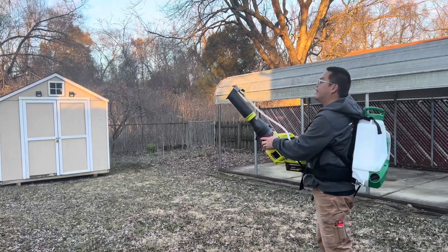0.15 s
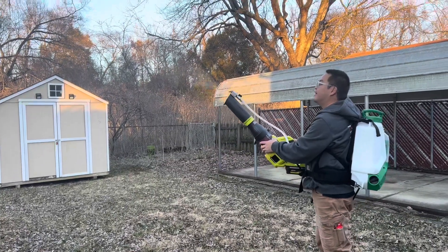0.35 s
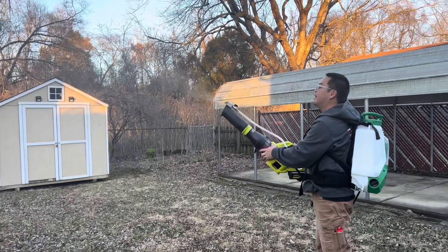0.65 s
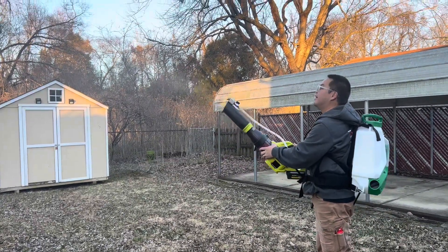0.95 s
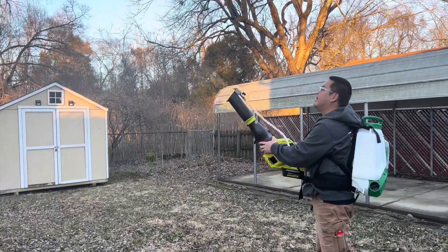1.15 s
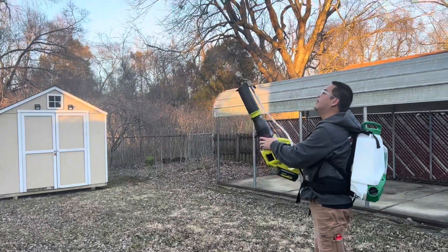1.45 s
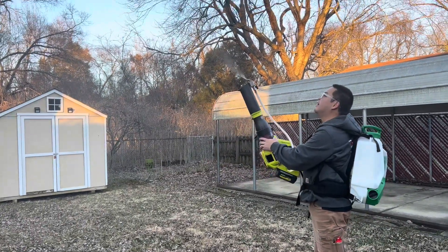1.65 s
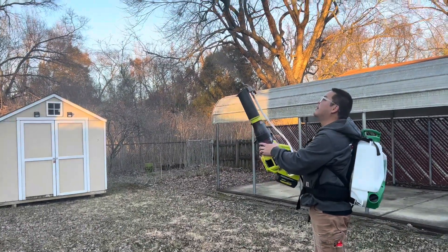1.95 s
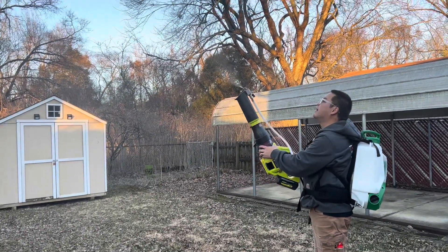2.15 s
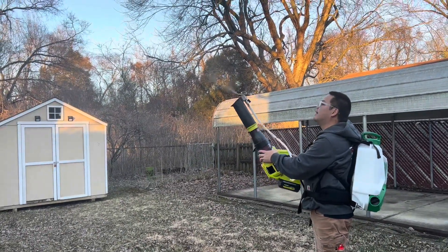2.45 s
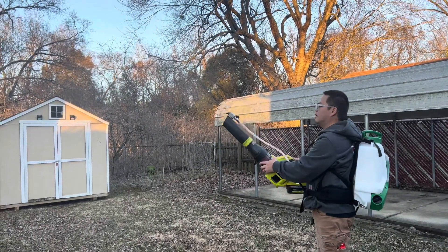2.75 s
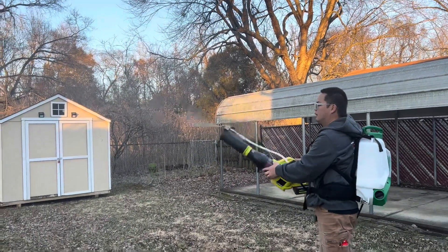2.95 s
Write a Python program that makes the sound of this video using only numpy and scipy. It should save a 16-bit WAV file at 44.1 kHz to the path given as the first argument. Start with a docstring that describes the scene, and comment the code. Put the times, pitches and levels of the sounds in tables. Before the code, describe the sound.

A battery leaf blower a few metres away runs at full speed throughout, its piercing steady whine riding on dense rushing air, swelling and shifting slightly as the tube tilts; open yard, stereo phone microphone.

```python
"""In a yard, a battery leaf blower a few metres from a phone runs flat out and is tilted up and down.
A nine-bladed fan whines in sines at multiples of the shaft speed; each strong tone swells and shifts
between the ears as the tube turns. Coloured noise makes the rushing air, and narrower noise bands
the tube's boom and howls, the haze around the blade tone and a wavering hum.
A low drone, one gliding sine, passes in the distance."""
import sys
import numpy as np
from scipy import signal
from scipy.fft import rfft, irfft
from scipy.io import wavfile
from scipy.ndimage import uniform_filter1d

SR = 44100
rng = np.random.default_rng(int(sys.argv[2]) if len(sys.argv) > 2 else 0)


def dump(signal):
    """Clip the signal to [-1, 1] and save it as 16-bit WAV at the path in sys.argv[1]."""
    limited = np.clip(np.atleast_2d(signal).T, -1, 1)
    pcm = np.round(limited * 32767).astype(np.int16)
    wavfile.write(sys.argv[1], SR, pcm)


N = 136710
TIME_S = np.arange(N) / SR

# Noise bands: boom, low howl, high howl, haze, hum.
# Each row: width in Hz, level offset in dB, opposed part relative to the common part in dB.
RINGS = [(98, -4, -17), (148, -3.5, -17), (148, -4.5, -20), (93, -2.5, -10), (6, -1.5, -2)]


def undb(db):
    """Gain of a level in dB."""
    return 10 ** (np.asarray(db) / 20)


def curve(table, col):
    """One column of a table, interpolated sample by sample over the time in column 0."""
    rows = np.array(table, float)
    return np.interp(TIME_S, rows[:, 0], rows[:, col])


def walk(rate_per_s):
    """Random levels held 1 / rate_per_s and smoothed twice over that time; spread about 0.75."""
    hold = int(SR / rate_per_s)
    steps = np.repeat(rng.standard_normal(N // hold + 1), hold)
    smooth = uniform_filter1d(uniform_filter1d(steps, hold), hold)
    return 1.02 * smooth[:N]


def unit(x):
    """Scale to an rms of 1."""
    return x / np.sqrt(np.mean(x ** 2))


def drone():
    """Distant drone: one sine, gliding in pitch and level, equal in both ears."""
    # Each row: time in seconds, frequency in Hz, rms level in dB.
    drone_rows = [(0.0, 77.7, -59), (0.47, 76.7, -56), (0.65, 70.3, -67), (0.78, 76, -59),
                  (1.26, 71.36, -61), (2.02, 80.7, -48.5), (2.57, 77.7, -57), (3.0, 83.5, -58),
                  (3.1, 89.6, -53)]
    phase = 2 * np.pi * np.cumsum(curve(drone_rows, 1)) / SR
    return np.sqrt(2) * undb(curve(drone_rows, 2)) * np.sin(phase)


def ring(table, width_hz, offset_db, side_db):
    """Noise band: lowpassed noise on a moving carrier, part common to the ears, part opposed."""
    lowpass = signal.butter(2, width_hz / 2, fs=SR, output="sos")
    slow = signal.sosfilt(lowpass, rng.standard_normal((2, 2, N)))
    phase = 2 * np.pi * np.cumsum(curve(table, 2)) / SR
    mid, side = (unit(v) for v in slow[0] * np.cos(phase) + slow[1] * np.sin(phase))
    side = undb(side_db) * side
    return np.array([mid + side, mid - side]) * undb(curve(table, 1) + offset_db)


def hum():
    """Wavering hum: a very narrow noise band, wide between the ears."""
    # Each row: time in seconds, level before offset in dB, centre in Hz.
    hum_rows = [(0, -57.5, 136), (1.0, -64, 136), (1.3, -54.5, 136), (1.7, -52.5, 136), (2.0, -64, 136),
                (2.8, -60, 136), (3.1, -65, 136)]
    return ring(hum_rows, *RINGS[4])


def rush():
    """Rushing air: coloured noise, partly shared by the ears; each octave drifts and flickers alone."""
    # Each row: frequency in Hz, common part in relative dB per Hz, opposed part in relative dB per Hz,
    # lean to the left from -1 to 1.
    air_rows = np.array([(45.0, -12.5, -34.1, 0.07), (60.3, -16, -33, -0.03), (87, -13.5, -19, 0.37),
                         (110.0, -15.5, -31, 0.1), (133, -11.5, -19.0, -0.01), (178, -19, -28.0, 0.28),
                         (244, -14, -27, 0.51), (305, -7, -19.5, 0.38), (415, -10, -21, 0.12),
                         (540, -14.5, -16, 0.032), (695, -11.0, -14, -0.36), (935, -7, -11.9, -0.17),
                         (1100.0, -7.5, -12, -0.02), (1310, -6.5, -12.9, 0.062), (1530, -13, -13, -0.22),
                         (1770, -11, -13, -0.21), (2000.0, -2, -13, -0.11), (2220, -6, -25, 0.1),
                         (2420, -5, -16, 0.07), (2750, -6.5, -12, 0.26), (3060, -9.9, -15, 0.44),
                         (3370, -14, -13, 0.16), (3570, -7.5, -14, 0.01), (3820, -7.6, -12, 0.33),
                         (4030, -11.5, -13.5, 0.051), (4650, -10, -13.5, 0.28), (5040, -12.5, -14.0, 0.39),
                         (5400, -16, -19, 0.6), (5560.0, -13.5, -14, 0.69), (5970, -11, -12, 0.65),
                         (6200.0, -13.5, -15.5, 0.55), (6830, -13, -15, 0.58), (7400.0, -18, -16.1, 0.37),
                         (8100.0, -15.5, -14.8, 0.39), (8750, -19, -19, 0.4), (9820, -23.5, -19.8, -0.17),
                         (10130, -26, -21.6, -0.04), (10700, -69, -22.7, -0.01), (11060, -37, -21.3, 0.01),
                         (11260, -24.6, -18, 0.02), (11740, -18, -17.2, 0.01), (12400, -16.7, -19.5, 0.03),
                         (12700.0, -17, -38, -0.0), (14100, -20, -50.0, -0.01),
                         (14500.0, -27, -42.9, -0.04), (15000.0, -32, -38, 0.02), (15500, -43.3, -32, 0.05)])
    # Each row: time in seconds, level before lift in dB.
    level_rows = [(0, -39), (.3, -38.5), (.8, -39.5), (1.2, -40), (1.8, -40), (2.0, -40), (2.5, -40.5),
                  (2.8, -40.3), (3.1, -40.5)]
    lift_db = 11
    drift_db, drift_per_s = 0.83, 2.13  # dB per unit of walk
    flicker_db, flicker_per_s = 1.3, 7.89

    hz = np.arange(N // 2 + 1) * SR / N + 1e-3
    log_hz, log_row_hz = np.log(hz), np.log(air_rows[:, 0])
    mid_db, side_db, lean = (np.interp(log_hz, log_row_hz, air_rows[:, k]) for k in (1, 2, 3))
    lean = np.clip(lean, -1, 1)
    low_cut = np.minimum(hz / air_rows[0, 0], 1) ** 5
    a, b = rfft(rng.standard_normal((2, N))) * low_cut
    mid = a * undb(mid_db)
    side = (lean * a + np.sqrt(1 - lean ** 2) * b) * undb(side_db)  # correlation with mid = lean
    ears = np.array([mid + side, mid - side])

    out = 0
    for octave in range(10):
        # crossfaded octave bands, centred from 32 Hz up
        band = np.cos(np.pi / 2 * np.clip(np.log2(hz / 32) - octave, -1, 1)) ** 2
        sway_db = drift_db * walk(drift_per_s) + flicker_db * walk(flicker_per_s)
        out = out + irfft(ears * band, N) * undb(sway_db)
    return unit(out) * undb(curve(level_rows, 1) + lift_db)


def tube_resonances():
    """Tube resonances: a boom, and howls below and above the blade tone, as noise bands."""
    # Each row: time in seconds, level before offset in dB, centre in Hz.
    boom_rows = [(0, -43, 303.5), (.15, -40, 305), (.45, -39, 304.5), (.9, -43.5, 305), (1.3, -38, 302.8),
                 (1.9, -41.5, 306), (2.2, -41.5, 307), (2.7, -44.5, 299.7), (2.87, -39.5, 290.6),
                 (3.1, -42, 299.5)]
    low_howl_rows = [(0, -36, 1720), (.6, -36, 1715), (1.2, -38.5, 1722), (1.45, -33, 1850),
                     (1.8, -32, 1852), (2.3, -35, 1833), (2.499, -36.5, 1809), (2.75, -37.5, 1768),
                     (3.1, -37, 1760)]
    high_howl_rows = [(0, -38, 2060), (.45, -32, 2043), (.72, -32, 2041), (1.05, -33, 2045),
                      (1.25, -44, 2100), (1.45, -35.5, 2146), (2.1, -34, 2140), (2.4, -37.5, 2142),
                      (2.8, -37, 2090), (3.1, -32, 2090)]
    tables = [boom_rows, low_howl_rows, high_howl_rows]
    return sum(ring(table, *settings) for table, settings in zip(tables, RINGS[:3]))


def haze():
    """Turbulence blurs the blade tone: a noise band around it."""
    # Each row: time in seconds, level before offset in dB, centre in Hz.
    haze_rows = [(0, -30, 1960), (.5, -36, 1958), (1.0, -32, 1964), (1.3, -32, 1962), (2.0, -39, 1954),
                 (2.6, -34, 1960), (3.1, -39, 1955)]
    return ring(haze_rows, *RINGS[3])


def tone(phase, db, pan_db, lead_rad):
    """Fluttering sine; db sets the rms of the left-right mean, unless the ears nearly cancel."""
    flutter_db, flutter_per_s, wobble_rad = 0.5, 30, .08  # dB and rad per unit of walk
    right_gain = undb(-pan_db)
    ear_sum = np.maximum(abs(1 + right_gain * np.exp(1j * lead_rad)), .5)
    left = 2 * np.sqrt(2) * undb(db + flutter_db * walk(flutter_per_s)) / ear_sum
    phase = phase + wobble_rad * walk(flutter_per_s) + 2 * np.pi * rng.random()
    return np.array([left * np.sin(phase + lead_rad), left * right_gain * np.sin(phase)])


def whine():
    """Fan and motor whine: blade tones, motor tone and lesser orders, all locked to the shaft."""
    blades, motor_order = 9, 13
    beside_third_db = -19.5  # order 26 relative to the third blade tone
    # Each row: time in seconds, blade tone in Hz.
    blade_hz_rows = [(0.0, 1965), (3.04, 1962)]
    # Strong tones. Each row: time in seconds, level in dB, left minus right in dB.
    blade_1 = [(0.0, -18.5, 1), (0.05, -19, -1), (0.45, -18.5, 1.0), (0.8, -22.5, 2.0), (1.04, -20.5, 0.5),
               (1.46, -23.5, -2.0), (2.31, -24, -1), (2.52, -22, -1.5), (2.7, -20, 1), (2.93, -23.5, 1.0),
               (3.06, -26.5, -1.5), (3.1, -27, -2.0)]
    blade_2 = [(0.0, -36.5, 3), (0.29, -36, 4.0), (0.31, -34.5, 2.0), (1.01, -36, 3.0), (1.15, -43.5, -5),
               (1.33, -40.5, 14), (1.45, -36, 10), (1.51, -42, 17.5), (2.01, -49.5, 1.5),
               (2.41, -38.5, 4.5), (2.55, -38.5, 2), (2.63, -38, 4.5), (2.71, -43.5, 0.5), (2.78, -44, 12),
               (2.83, -50, -4.0), (2.93, -36.5, 1.0), (3.01, -36, -2.0), (3.1, -45, -6)]
    blade_3 = [(0.0, -35, 14.5), (0.4, -32.5, 17.0), (0.53, -52, 0.0), (0.59, -40, 11), (0.86, -38, 8),
               (0.95, -45.5, 9.0), (1.03, -33, 14.5), (1.19, -45, 7.5), (1.33, -34, 28), (1.48, -39.5, 25),
               (1.73, -46, 15), (2.01, -34.5, 23), (2.36, -34.5, 22), (2.43, -32.5, 27), (2.68, -44.5, 4.5),
               (2.76, -38, 12.0), (2.87, -43, 10), (3.0, -50, 5), (3.06, -45, -5), (3.1, -52, -2.5)]
    blade_4 = [(0.0, -49, 7), (0.48, -53, 5.5), (0.62, -58, -2.0), (0.78, -46, 6.5), (0.91, -52, -2.0),
               (0.98, -50, 4.0), (1.61, -48, 9), (2.22, -50, -5), (2.86, -55, 5.5), (3.1, -45, 8.5)]
    motor = [(0.0, -36.5, 8.0), (0.19, -36.5, 23), (0.78, -48.5, 6), (0.88, -41, -3), (0.98, -54, 5.5),
             (1.02, -36.5, 11.0), (1.15, -32.5, 6.5), (1.37, -34, 5), (1.5, -35, -0.5), (2.04, -36, 3),
             (2.09, -37, 0.0), (2.41, -35.5, -2.5), (2.64, -35, 5.0), (2.73, -35, 14), (2.87, -49, 16),
             (2.9, -38.5, 8), (2.98, -33, 7), (3.1, -32.5, 4.0)]
    shaft = [(0.0, -55, 0.0), (0.02, -50, -0.5), (0.96, -50.5, -0.5), (0.99, -65, -2.5), (1.19, -51, -0.5),
             (1.4, -53, 0.5), (2.51, -54.5, -2), (3.1, -52, 1)]
    # First blade tone. Each row: time in seconds, phase lead of the left ear in rad.
    blade_1_lead = [(0, -0.36), (.9, -0.35), (1.3, -0.53), (1.5, -0.12), (2.7, -0.3), (3.1, -0.27)]
    # Phase lead of the left ear in rad: blade tones 2, 3 and 4, motor, shaft.
    leads_rad = [-.5, 2.6, -1.5, .3, 0]
    # Faint orders: multiples of the shaft speed.
    faint_orders = [5, 10, 12, 22, 39, 44, 45, 54, 61]
    # Each row, one per faint order: level in dB, left minus right in dB, left lead in rad.
    faint_rows = [(-57, -2, -.2), (-48, .3, -.05), (-53, .5, .1), (-59, 2, .5), (-58, 4, -2.2),
                  (-68, .1, 2.0), (-61, .1, 2.0), (-59, .1, 1.5), (-57, 0, 0)]

    turn = 2 * np.pi * np.cumsum(curve(blade_hz_rows, 1)) / blades / SR  # shaft angle, rad
    out = tone(blades * turn, curve(blade_1, 1), curve(blade_1, 2), curve(blade_1_lead, 1))
    orders = [2 * blades, 3 * blades, 4 * blades, motor_order, 1]
    tables = [blade_2, blade_3, blade_4, motor, shaft]
    for order, table, lead_rad in zip(orders, tables, leads_rad):
        out = out + tone(order * turn, curve(table, 1), curve(table, 2), lead_rad)
    beside_db = curve(blade_3, 1) + beside_third_db
    out = out + tone(2 * motor_order * turn, beside_db, curve(blade_3, 2), leads_rad[1])
    for order, (db, pan_db, lead_rad) in zip(faint_orders, faint_rows):
        out = out + tone(order * turn, db, pan_db, lead_rad)
    return out


def scene():
    """Distant drone, hum and blower, summed in two ears."""
    blower = rush() + tube_resonances() + haze() + whine()
    return drone() + hum() + blower


def record(dry):
    """The phone cuts the top: a steep elliptic lowpass."""
    top_hz, ripple_db, stop_db = 15600, .2, 80
    return signal.sosfilt(signal.ellip(10, ripple_db, stop_db, top_hz, fs=SR, output="sos"), dry)


dry = scene()
out = record(dry)
dump(out)
```